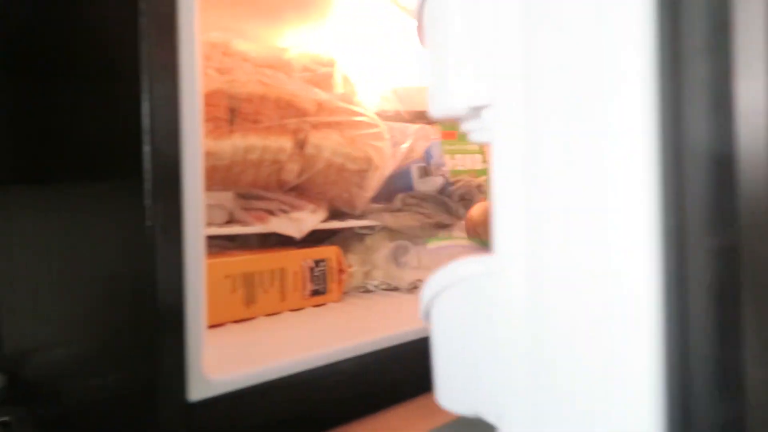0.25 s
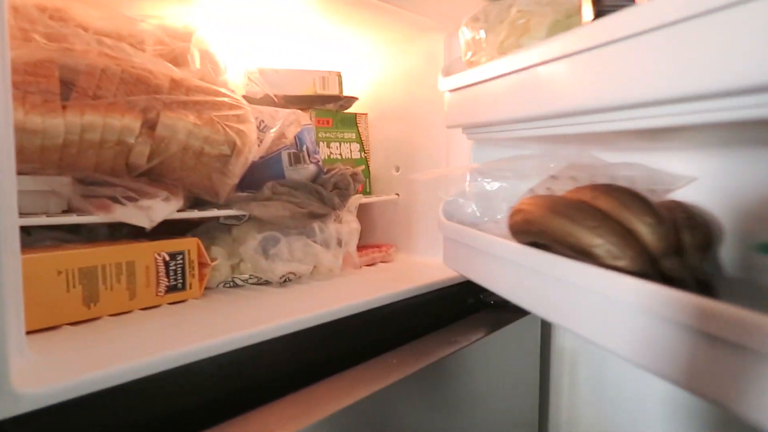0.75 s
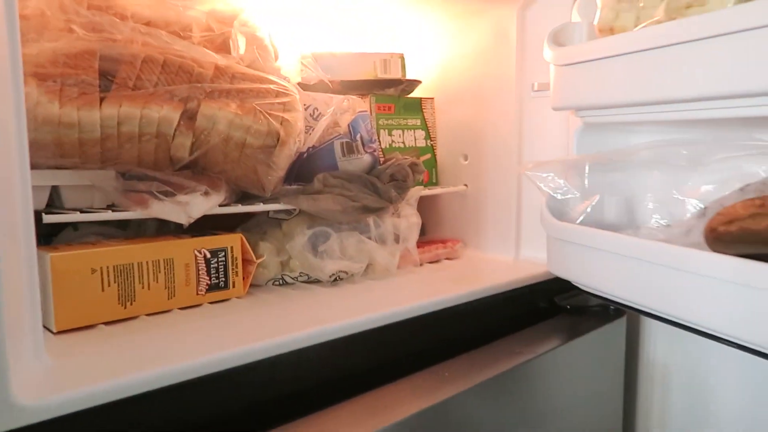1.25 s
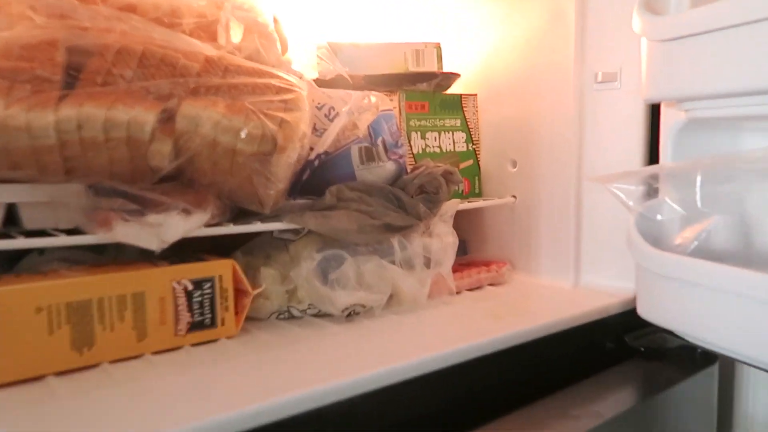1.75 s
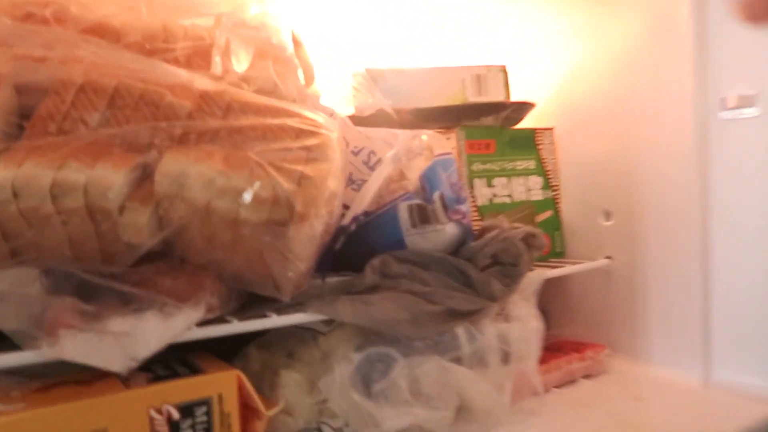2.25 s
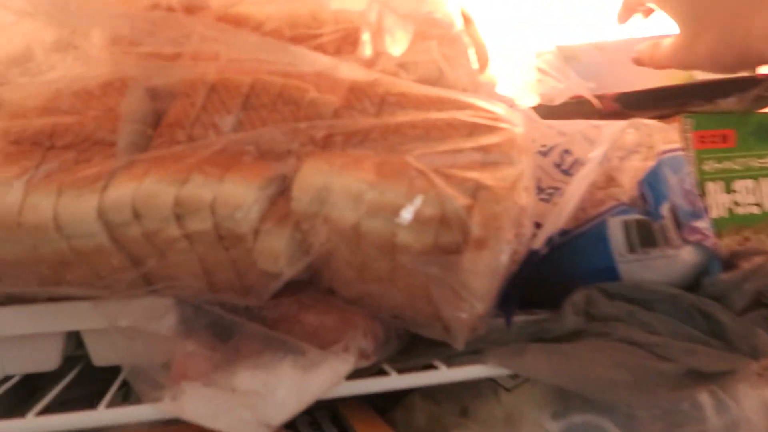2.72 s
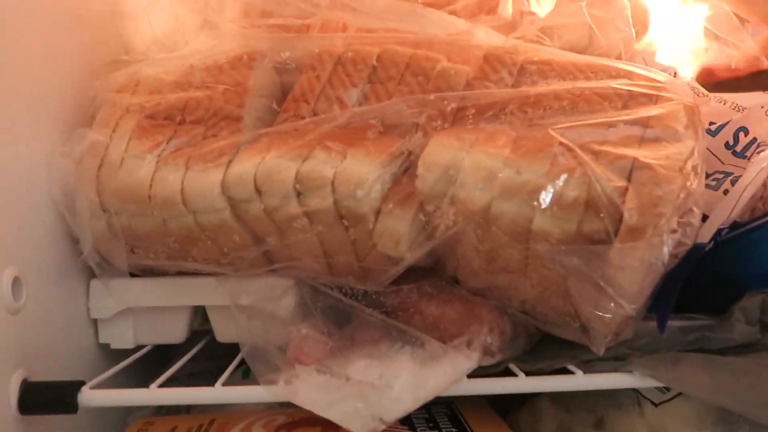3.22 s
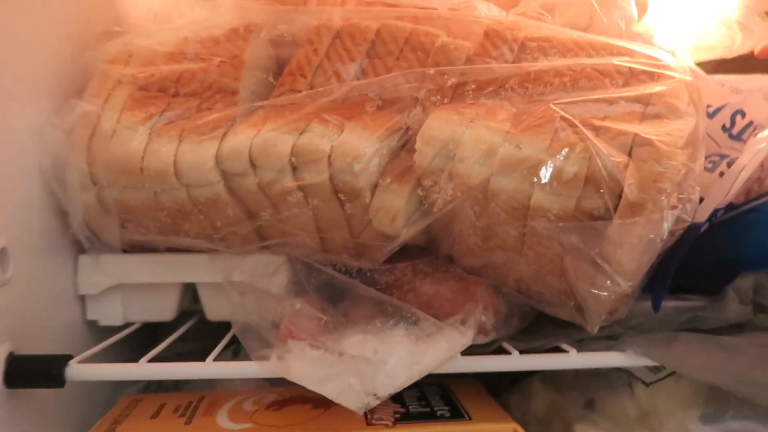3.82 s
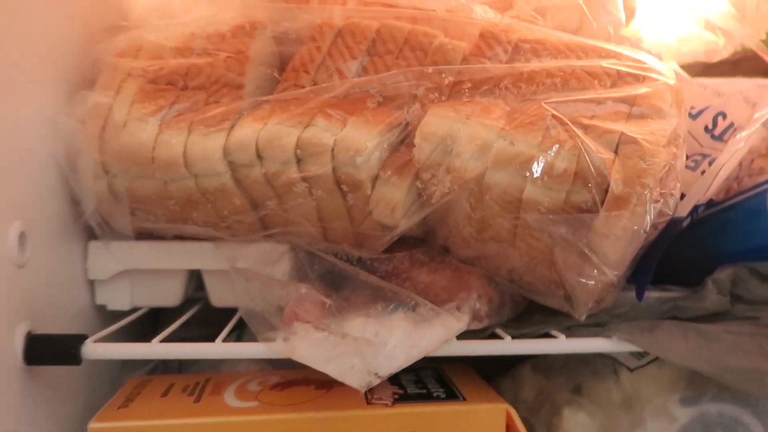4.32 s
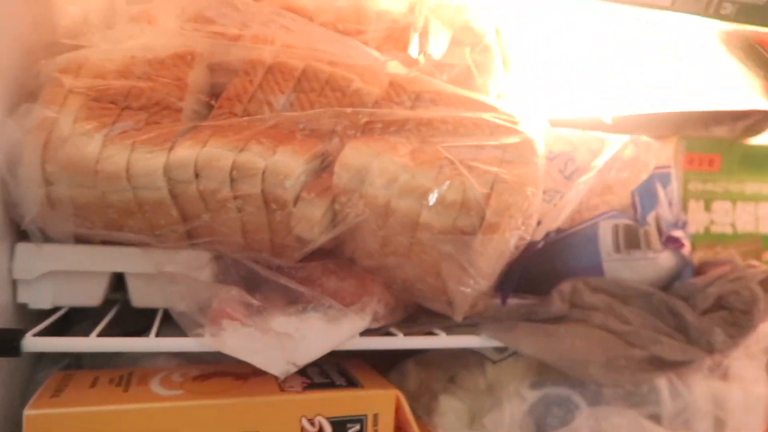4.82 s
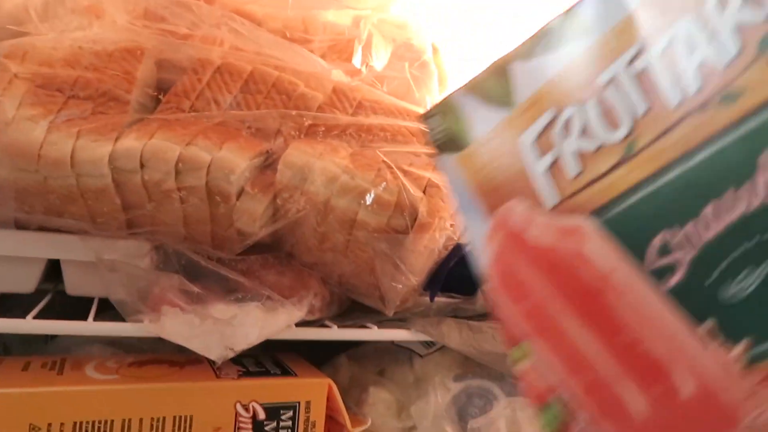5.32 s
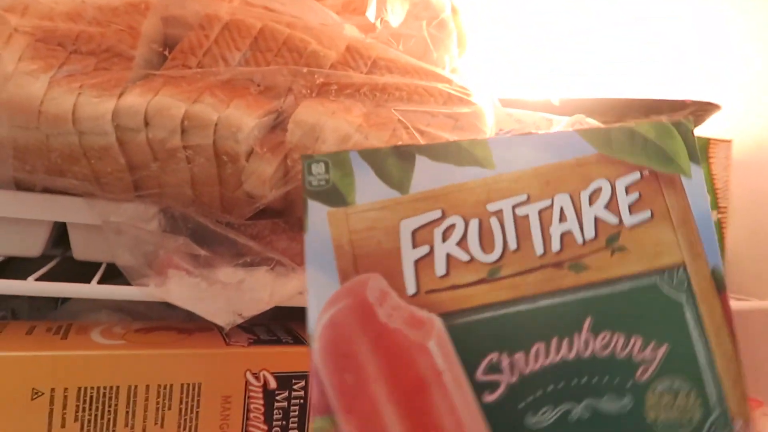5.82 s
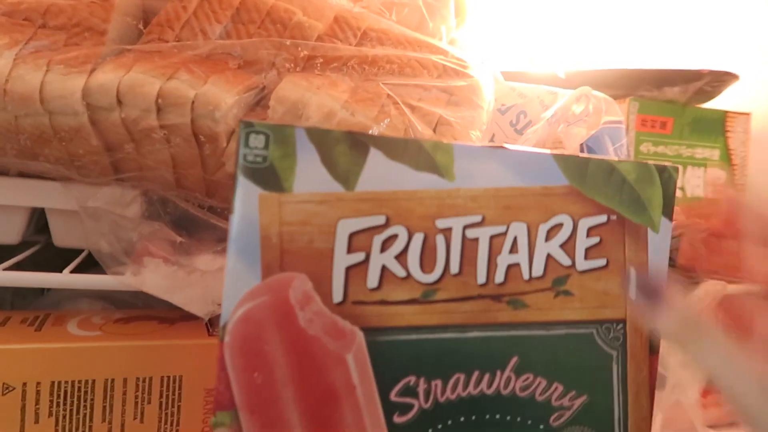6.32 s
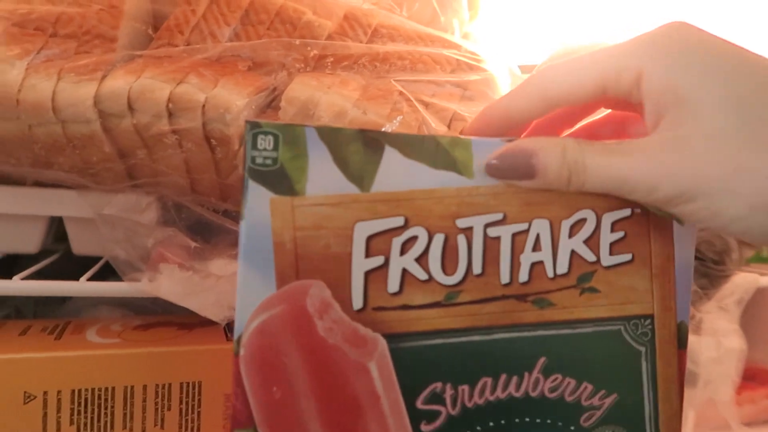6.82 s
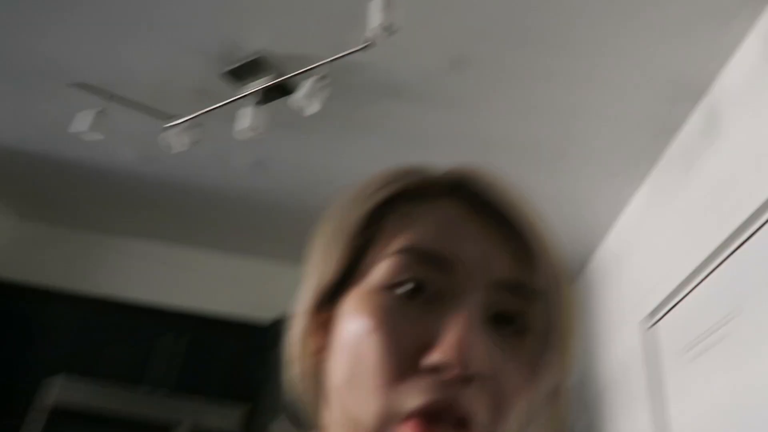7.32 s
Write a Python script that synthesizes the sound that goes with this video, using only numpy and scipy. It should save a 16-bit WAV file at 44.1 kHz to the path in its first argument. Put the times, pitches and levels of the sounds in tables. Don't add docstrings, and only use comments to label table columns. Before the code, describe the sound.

A freezer door opens onto a loud, low fan hum and airy rush, plastic bags crackle, a carton knocks, then abrupt near silence.

```python
import sys
import numpy as np
from scipy import signal
from scipy.fft import rfft, irfft
from scipy.io import wavfile
from scipy.ndimage import uniform_filter1d

SR = 44100
rng = np.random.default_rng(int(sys.argv[2]) if len(sys.argv) > 2 else 0)


def unload_audio(sound):
    columns = np.transpose(np.atleast_2d(sound))
    steps = np.round(np.clip(columns, -1, 1) * 32767)
    wavfile.write(sys.argv[1], SR, steps.astype(np.int16))


def gain_from_db(level_db):
    decades = np.asarray(level_db, float) / 20
    return 10 ** decades


N = 333372
CUT_IN_S, CUT_OUT_S = 0.167, 7.3705

# time_s, nearness_to_fan_db, grille_whistle_db
APPROACH = [(.16, -12.5, -10), (.36, -9.5, -10.5), (.76, -6.5, 5), (1.28, -6, 9), (2.05, -3.5, 10),
            (2.4, -2, 12), (2.85, 1, 3), (3.13, 0, 10), (3.5, 1.5, 9.5), (4.4, .5, 16), (4.86, -0.5, 5),
            (5.15, -1, 7), (5.56, 0.5, 7), (5.92, -1, 16.5), (6.2, 0, 11), (6.87, 1, 13), (7.2, .5, 7),
            (7.37, -1, 7)]
# time_s, stance (0 at the door, 1 deep inside, 2 behind the carton)
STANCE = [
    (0, 0),
    (1.2, .12),
    (2.1, .35),
    (2.5, 1),
    (4.5, 1),
    (5.1, 2),
    (7.4, 2),
]


def evened(x):
    return x / np.sqrt(np.mean(np.atleast_2d(x)[0] ** 2) + 1e-20)


def read(points, hz):
    point_hz, value = np.transpose(points)
    return np.interp(np.log(np.minimum(hz, 12500) + 1), np.log(point_hz + 1), value)


def peak(hz, centre_hz, width_hz):
    return 1 / (1 + (2 * (hz - centre_hz) / width_hz) ** 2)


def band(x, centre_hz, width_hz, order=2):
    edges_hz = np.clip([centre_hz - width_hz / 2, centre_hz + width_hz / 2], 30, SR / 2 - 500)
    return signal.sosfilt(signal.butter(order, edges_hz, "band", fs=SR, output="sos"), x)


def wander(rate_hz):
    t = np.arange(N) / SR
    rates_hz = rate_hz * np.geomspace(.05, 1, 12)
    return evened(sum(np.sin(2 * np.pi * (f * t + rng.random())) / np.sqrt(f) for f in rates_hz))


def control(t, order, table=APPROACH):
    rows = np.array(table)
    return np.interp(t, rows[:, 0], rows[:, order])


def air(colour_db, size, patchy_db, count=12):
    # hz, side_minus_mid_db
    width_db = [(40, -26), (65, -20), (110, -36), (200, -24.5), (380, -18), (700, -16.5), (1290, -18),
                (2380, -18), (4400, -10), (8120, -6.5), (15000, 7)]
    hz = np.fft.rfftfreq(size, 1 / SR)[:, None]
    t = np.arange(4 * N // size + 5) * size / 4 / SR
    a, b, c, d, patches = rng.standard_normal((len(t), len(hz), 5)).T
    patches = uniform_filter1d(patches, size=4, axis=0)
    patches = evened(uniform_filter1d(patches, size=count, axis=1).ravel()).reshape(a.shape)
    height = gain_from_db(colour_db(hz, t) + 0 * t)
    height = height / np.linalg.norm(height, axis=0) * gain_from_db(patchy_db * patches)
    z = np.array([a + 1j * b, gain_from_db(read(width_db, hz)) * (c + 1j * d)]) * height
    return evened(signal.istft(z, nperseg=size, noverlap=3 * size // 4)[1][:, :N])


def burst(noise, ms, rise):
    u = np.arange(noise.shape[-1]) / SR / (abs(ms) / 1000)
    return noise * (1 - np.exp(-u / rise)) * np.exp(-u ** 2 * 1.86)


def add(out, s, mid, side, db):
    part = out[:, round((s - .001) * SR):][:, :len(mid)]
    part += np.array([mid, side]) * gain_from_db(db) / np.abs(mid).max()


def kitchen():
    # hz, level_db_per_hz
    before_colour = [(25, -34), (45, -14), (85, -12), (118, 0), (145, -13), (175, -3.5), (260, -16),
                     (400, -19.5), (600, -20), (1000, -33.5), (2000, -45), (4000, -51), (8000, -64),
                     (12500, -73)]
    # hz, level_db_per_hz
    after_colour = [(25, -35), (45, -15), (100, -17), (150, 1.5), (250, -7.5), (400, -8.5), (500, -12.5),
                    (700, -17), (1000, -22.5), (2000, -32.5), (4000, -44), (8000, -52.5), (12500, -59)]
    before = gain_from_db(-31.5) * air(lambda hz, t: read(before_colour, hz), size=2048, patchy_db=3.0)
    after = gain_from_db(-37.5) * air(lambda hz, t: read(after_colour, hz), size=2048, patchy_db=1.5)
    hum_hz, hum_db = 147, -45
    hum = gain_from_db(hum_db) * np.sqrt(2) * np.sin(2 * np.pi * hum_hz * np.arange(N) / SR)
    return before, after + hum * np.array([[1], [0]])


def puff():
    start_s, end_s, level_db = 3.71, 3.92, -33
    u = np.clip((np.arange(N) / SR - start_s) / (end_s - start_s), 0, 1)
    flutter = evened(band(rng.standard_normal(N), 80, 100))
    return gain_from_db(level_db) * np.sin(np.pi * u) * flutter * np.array([[0], [1]])


def slides():
    # peak_s, rise_s, fall_s, level_db
    strokes = [(.18, 0.11, 0.043, -66), (1.53, .1, 0.082, -60), (2., .3, 0.25, -55.5),
               (2.47, .15, 0.17, -50), (3.1, 0.14, 0.34, -53), (3.35, 0.038, 0.044, -50),
               (3.42, .04, .05, -54), (3.52, 0.036, 0.034, -45), (3.76, 0.13, 0.079, -47.5),
               (4.11, 0.43, .12, -51), (4.43, 0.14, 0.15, -46), (4.63, 0.043, 0.084, -42),
               (4.82, 0.1, 0.06, -46), (4.89, .09, .07, -43.5), (4.96, 0.054, 0.033, -40),
               (5.3, .15, .12, -65), (5.7, 0.024, .05, -51), (5.95, 0.13, .1, -53),
               (6.12, 0.12, 0.072, -46), (6.3, .1, 0.23, -62), (6.6, 0.058, .06, -53.5),
               (7., 0.035, .08, -48), (7.1, 0.091, 0.079, -47), (7.28, 0.092, .15, -58),
               (7.4, .03, .03, -67), (7.548, .012, .03, -54)]
    # hz, level_db_per_hz
    hiss_colour = [(880, -42), (1500, -2), (1610, -2.5), (1760, -6), (2220, 0), (3390, -15.5), (4510, -9.5),
                   (4880, -10.5), (6600, -15), (12500, -23.5), (16200, -53.5), (22000, -120)]
    fall_db, grit_db = -9, 2.2
    t = np.arange(N) / SR
    power = 0
    for peak_s, rise_s, fall_s, db in strokes:
        away = abs(t - peak_s) / np.where(t < peak_s, rise_s, fall_s)
        same_side_of_cut = (t < CUT_OUT_S) == (peak_s < CUT_OUT_S)
        power = power + gain_from_db(2 * (db + fall_db * away)) * same_side_of_cut
    grit = uniform_filter1d(rng.standard_normal(N), size=120) * np.sqrt(120)
    hiss = air(lambda hz, t: read(hiss_colour, hz), size=256, patchy_db=3.0, count=30)
    return np.sqrt(power) * gain_from_db(2.0 + grit_db * grit) * hiss * gain_from_db([[0], [3.]])


def snaps():
    # start_s, level_db, pan_db
    film_snaps = [(1.9937, -39, -1), (3.3169, -45, -8), (3.3353, -26.5, -9), (3.345, -31, -.6),
                  (3.3995, -36, 3), (3.4054, -30, 0), (3.418, -31, -7), (3.4876, -34, 0), (3.497, -32, 7),
                  (3.529, -24.5, -2), (3.5618, -37, 3), (3.631, -41, 5), (3.6501, -38, 2),
                  (3.7209, -39, -1.1), (3.7353, -38, -1.1), (3.7456, -30, -1), (3.7544, -29, 1.1),
                  (3.765, -25.5, 0), (3.7852, -28, .6), (3.8204, -41, -1.1), (4.13, -33, 2.1),
                  (4.183, -37, -4), (4.343, -25, 2.1), (4.3814, -38, -2), (4.742, -35, 1.1),
                  (4.956, -31, -1), (6.1055, -48, -4.5), (6.1452, -33, 4)]
    ticks_s = (.7751, .8939, 1.034, 2.1144, 2.716, 3.065, 3.4694, 5.2602, 5.472, 5.961, 6.587)
    # hz, half_lag_rad
    port_lag = [(3000, 0.15), (8000, 0.57), (10600, 1.17), (12500, 0.74)]
    fold_hz, fold_ms = (4030, 5930), (3.5, 7.5)
    out = np.zeros((2, N))
    rows = list(film_snaps) + [(s, -46, 0) for s in ticks_s]
    chances, noises = rng.random((len(rows), 2)), rng.standard_normal((len(rows), 2, 2048))
    for (s, db, pan_db), (fold, span), noise in zip(rows, chances, noises):
        ring_hz = np.interp(fold ** 2, (0, 1), fold_hz)
        cracks = burst(noise, np.interp(span, (0, 1), fold_ms), rise=0.83)
        mid, side = 1.1 * band(cracks, 5500, 13000) + 0.98 * band(cracks, ring_hz, 0.25 * ring_hz)
        lag_rad, z = read(port_lag, np.fft.rfftfreq(2048, 1 / SR)), rfft(mid)
        mid = irfft(z * np.cos(lag_rad))
        across = irfft(z * np.sin(lag_rad) * -1j)
        side = np.tanh(pan_db / 17.4) * mid + across + .3 * band(side, 11000, 10000, order=1)
        add(out, s, mid, side, db - 0.5)
    return out


def rings():
    # start_s, level_db, ring_hz, length_ms
    blow_rings = [(4.4628, -16, 1080, 7), (4.4628, -20, 1680, 3.5), (4.463, -24, 780, 5.8),
                  (4.4637, -9, 2470, 4), (4.4625, -18, 2150, 2.5), (4.467, -21, 2000, 3.3),
                  (4.470, -29, 2950, 4), (4.4635, -22, 3040, 4.7), (4.4625, -20, 3680, 3.3),
                  (4.463, -28, 5220, 4), (4.4641, -24, 5900, 2.6), (4.6083, -20.5, 1050, 7),
                  (4.6095, -20, 1530, 5), (4.6083, -13.5, 1900, 4.4), (4.611, -10.5, 2410, 2.9),
                  (4.6135, -20, 2300, 2.1), (4.6085, -20, 3630, 4), (4.610, -19.5, 4160, 5),
                  (4.608, -22, 5280, 3), (4.610, -26, 6390, 4.9), (4.609, -26, 7400, 3.3),
                  (4.609, -27, 7900, 4.9), (4.7706, -22.5, 1060, 7.9), (4.7705, -27, 2200, 4),
                  (4.7765, -27, 2300, 4), (4.787, -27, 1150, 9), (4.774, -28, 1600, 3.6),
                  (4.7785, -31, 2620, 3.7), (4.779, -29, 1750, 4.4), (4.788, -33, 2250, 6),
                  (5.689, -28, 2150, 4), (5.692, -31, 1060, 9), (6.123, -23, 1890, 4),
                  (6.124, -27, 1350, 5), (6.13, -24, 400, 12), (6.1235, -30, 3400, 3.4),
                  (6.126, -30, 4350, 3.5), (6.126, -30, 3340, 7), (6.132, -27, 1940, 5.4),
                  (6.122, -28, 980, 12)]
    # start_s, level_db, ring_hz, length_ms
    more_blow_rings = [(4.121, -33, 1500, 4), (4.1225, -32, 2900, 4), (4.1315, -36, 4800, 4),
                       (4.132, -35, 2500, 4), (4.1415, -28, 2020, 4), (4.145, -28, 2680, 4),
                       (4.142, -33, 3750, 4), (4.145, -30, 880, 5), (4.741, -37, 5900, 5), (4.741, -34, 2300, 5),
                       (4.7632, -35, 2250, 4), (5.681, -35, 3100, 5), (4.181, -37, 2150, 6),
                       (4.7702, -30, 3800, 2.5), (4.7702, -32, 4600, 2.5), (4.7702, -31, 3000, 2.5),
                       (4.7702, -35, 5600, 2), (4.7702, -35, 6500, 2), (4.7702, -35, 7600, 2.5),
                       (4.7745, -38, 4300, 5), (4.7745, -41, 5800, 3), (4.779, -38, 3600, 4),
                       (4.7705, -28, 1500, 3), (4.778, -27, 900, 5), (4.792, -33, 1800, 6), (4.801, -33, 2100, 5),
                       (4.809, -31, 1050, 8), (6.106, -35, 2900, 5), (6.107, -38, 4500, 5),
                       (6.132, -29, 1000, 12), (6.147, -35, 2850, 8), (6.15, -31, 750, 12), (6.168, -32, 1150, 8)]
    out, t = np.zeros((2, N)), np.arange(2048) / SR
    for s, db, hz, ms in list(blow_rings) + list(more_blow_rings):
        ring = burst(np.sin(2 * np.pi * hz * t), ms, rise=0.24)
        add(out, s, ring, .25 * np.sqrt(1000 / hz) * np.roll(ring, shift=10), db)
    return out


def knocks():
    # start_s, level_db, ring_hz, treble_rel_db, length_ms
    hits = [(4.12, -30, 2200, -12, 5.8), (4.141, -28, 2260, -18, 7.5), (4.4625, -14, 2300, 2, 2.4),
            (4.4634, -20, 1800, -2, 4.6), (4.608, -11, 2280, -8, 6.2), (4.7708, -25, 1560, -4, 2.7),
            (4.7745, -25, 1300, -12, 9), (5.6898, -28, 1800, -20, 2.8), (5.69, -18.5, 2200, -20, 18),
            (5.703, -21, 2500, -16, 20), (6.123, -25, 1870, -10, 8), (6.1328, -26, 1900, -18, 7.2),
            (4.773, -24, 2300, -16, 8), (4.786, -29, 1700, -18, 12), (4.799, -32, 1900, -18, 14),
            (4.467, -26, 1500, -14, 9), (6.126, -29, 2700, -8, 12), (4.619, -30, 2100, -12, 16),
            (4.637, -33, 2300, -12, 20), (4.776, -27, 1700, -14, 6), (5.709, -29, 1100, -14, 10)]
    body_db, body_db_per_doubling = -8, 7.5
    out = np.zeros((2, N))
    for (s, db, hz, high_db, ms), noise in zip(hits, rng.standard_normal((len(hits), 2, 4096))):
        low_db = body_db + body_db_per_doubling * np.log2(ms / 4)
        grains = noise * np.sqrt(np.abs(noise))
        cracks = burst(grains, ms, rise=0.57)
        panel = band(cracks, hz, 850) + 0.19 * band(cracks, 1.65 * hz, 600) + 0.5 * band(cracks, 2200, 2700)
        slow = burst(grains, 1.3 * ms, rise=0.028)
        body = evened(band(slow, 1030, 820) + (ms / 4.8) ** 2 * band(slow, 570, 990))
        edge = .5 * band(burst(noise, 0.5 * ms, rise=0.32), 6900, 10300) + band(cracks, 5200, 1470)
        hit = evened(panel) * gain_from_db([[0], [-23]])
        hit = hit + body * gain_from_db([[low_db], [low_db - 14]])
        hit = hit + evened(edge) * gain_from_db([[high_db], [high_db - 8]])
        add(out, s, *hit, db)
    t = np.arange(4096) / SR
    walls = band(rng.standard_normal((2, 4096)), 1560, 2700, order=1) * gain_from_db(-60 * t / 0.028) * (t > .003)
    walls = walls / np.linalg.norm(walls[0])
    rung = rings()
    answer = signal.oaconvolve(out + .3 * rung, walls, axes=1)[:, :N]
    return out + rung + gain_from_db(-13.5) * answer


def thuds():
    # start_s, level_db, ring_hz, t60_s
    thumps = [(3.9, -9.5, 182, 0.065), (4.773, -15, 350, 0.014), (4.7712, -21, 705, 0.037),
              (4.775, -22, 420, .04), (4.609, -24, 730, 0.039), (5.69, -7.5, 182, 0.06),
              (6.2, -20, 320, .05), (4.776, -13, 180, 0.037), (6.6, -18, 190, 0.063),
              (5.69, -19, 465, 0.032)]
    out, t = np.zeros((2, N)), np.arange(4096) / SR
    for s, db, hz, t60_s in thumps:
        ring = (1 - np.exp(-t * hz * 2.7)) * gain_from_db(-60 * t / t60_s) * np.sin(2 * np.pi * hz * t)
        add(out, s, ring, .04 * ring, db)
    return out


def motor():
    shaft_hz, blades, mains_hz = 48.45, 4, 118.
    # level_when_nearest_db, share_of_nearness, wavering_db
    tones = [
        (-25, 1.08, 1.3),
        (-39, 0.28, 2.5),
        (-49, 0.27, 2.),
    ]
    # time_s, width_s, level_db
    sways = [(.6, .17, 6), (1.33, .17, 7), (3.55, .12, 6), (3.9, .15, 7), (5.1, .12, 4), (7.3, .08, 5)]
    t = np.arange(N) / SR
    turns = np.cumsum(shaft_hz * (1 + 0.0015 * wander(3.048))) / SR
    phases = 2 * np.pi * np.array([blades * turns, mains_hz * t, turns])
    levels = gain_from_db([db + share * control(t, order=1) + waver_db * wander(6.) for db, share, waver_db in tones])
    sway_db = sum(db * np.exp(-((t - s) / width_s) ** 2) for s, width_s, db in sways)
    levels = levels * gain_from_db(np.outer([0, 0, 1], sway_db))
    return np.sqrt(2) * (levels * np.sin(phases)).sum(axis=0) * np.array([[1], [.03]])


def boom_db(hz, t):
    # hz, width_hz, door_db, inside_db
    modes = [(52, 14, -23, -28), (96, 50, -23, -17), (116.5, 9.2, -12, -11.5), (160, 26, -5.5, 1.5),
             (190.5, 23, -5.5, -7.5), (215.3, 30.4, -11, -9), (259.2, 31.7, -11.5, -10.5),
             (295.6, 46, -14, -16), (359, 35, -18.5, -14), (398, 18, -22, -12.5), (408, 9, -13, -20),
             (435, 22.6, -28.5, -16), (478.5, 24.3, -23, -20.5), (516, 13.7, -24.5, -26.5)]
    inside = np.minimum(control(t, order=1, table=STANCE), 1)
    power = sum(gain_from_db(2 * (door + (deep - door) * inside)) * peak(hz, f, w) ** 1.81 for f, w, door, deep in modes)
    return 10 * np.log10(power)


def rush_db(hz, t):
    # hz, level_db_per_hz
    door_colour = [(310, -39), (520, 2.5), (610, -9.5), (725, -5), (1220, -10.5), (1550, -15.5),
                   (2970, -20), (4260, -25.5), (12500, -46.5), (16200, -86.5), (22000, -120)]
    # hz, level_db_per_hz
    inside_colour = [(310, -27), (520, -1), (755, -3.5), (1070, -2), (1860, -17), (2100, -14.5),
                     (2970, -19), (3490, -18), (5060, -28.5), (12500, -47), (16200, -72), (22000, -120)]
    # hz, width_hz, door_db, inside_db, behind_carton_db
    shelf_waves = [(702, 65, 4.5, 5.5, -1), (875, 100, -0.5, 6, 2.5), (1028, 87, -0.5, 6, 5),
                   (1625, 260, 5, 2, -0.5), (1900, 200, 4.5, 4.5, 0), (2200, 290, -0.5, 5.5, 4.5),
                   (2500, 87, -0.5, 8, 1.5), (2700, 150, 0, -3, 0), (3330, 200, 3, 1, 0),
                   (3680, 300, -1, -4.5, -0.5), (4020, 290, -3, 8.5, -2), (4720, 250, 2, 4.5, -6),
                   (5040, 320, -2.5, 1, 6.5), (5600, 220, -1, 6.5, 3), (6400, 250, -3.5, 3, -2),
                   (7570, 500, -1, 7.5, 5), (8160, 250, 1, 4, 4.5), (11200, 900, 7.5, 8, 5.5)]
    bright = (.05, 0.52, 0.52)
    grille_hz, grille_width_hz = (2900, 3030, 2990), 170
    stance = control(t, order=1, table=STANCE)
    inside = np.clip(np.interp(stance, range(3), bright), 0, 1)
    waves = sum(peak(hz, f, w) * np.interp(stance, range(3), dbs) for f, w, *dbs in shelf_waves)
    whistle = peak(hz, np.interp(stance, range(3), grille_hz), grille_width_hz) * control(t, order=2)
    return (1 - inside) * read(door_colour, hz) + inside * read(inside_colour, hz) + waves + whistle


def fan():
    lull_s, lull_width_s, lull_db = 2.06, .03, -9
    t = np.arange(N) / SR
    near_db = control(t, order=1)
    node_db = lull_db * np.exp(-((t - lull_s) / lull_width_s) ** 2)
    boom = gain_from_db(-19.5 + near_db + node_db) * air(boom_db, size=4096, patchy_db=0.72)
    return boom + gain_from_db(-36 + 0.69 * near_db) * air(rush_db, size=512, patchy_db=1.81, count=120)


def scene():
    t = np.arange(N) / SR
    before, after = kitchen()
    opened = np.pi / 2 * np.clip((t - CUT_IN_S) / 0.12 + .5, 0, 1)
    freezer = np.cos(opened) * before + np.sin(opened) * fan() + motor()
    handling = slides()
    freezer = freezer + snaps() + knocks() + thuds() + puff()
    mid, side = np.where(t < CUT_OUT_S, freezer, after) + handling
    return np.array([mid + side, mid - side]) * gain_from_db([[-.1], [.1]])


def narrowed(side):
    # hz, share_of_blocks_lost
    lost_share = [(40, .5), (120, .35), (200, 0), (800, 0.01), (1100, .25), (1500, 0.4), (2400, 0.78),
                  (3300, 0.4), (4500, 0.62), (6200, 0.4), (7200, .03), (9000, 0)]
    hz, t, z = signal.stft(side, SR, nperseg=512)
    blocks = rng.standard_normal((len(t) // 4 + 1, len(hz) // 6 + 1))
    blocks = uniform_filter1d(blocks, size=4, axis=0) * 2
    spread = np.kron(blocks, np.ones((4, 6)))[:len(t), :len(hz)].T
    chance = .5 + .5 * np.tanh(.85 * spread)
    strength = np.abs(z[20:90]).sum(axis=0)
    steady = strength < 2.5 * np.median(strength)
    lost = (chance < read(lost_share, hz)[:, None]) & (t > .5) & (t < CUT_OUT_S) & steady
    return signal.istft(z * ~lost, SR, nperseg=512)[1][:N]


def masked(x):
    # hz, bar_over_running_level_db, gain_db
    top_band = [(11800, -12, 0), (12500, -8, 0), (12900, -4, -1), (13050, 4, -5), (13300, 0, -4),
                (13900, -1.5, -4), (14450, .5, -6), (14700, 5.5, -9), (15300, 10, -12), (15800, 15, -15)]
    top_from_hz, hum_share, treble_share, chance_db = 11800, .4, .35, 3.
    hz, t, z = signal.stft(x, SR, nperseg=512)
    bar_hz, bar_db, gain_db = np.transpose(top_band)
    power = uniform_filter1d((abs(z) ** 2).mean(axis=0), size=12, axis=0)
    level_db = 10 * np.log10(uniform_filter1d(power, size=3, axis=1) + 1e-20)
    hum_power = (abs(z[:, :8]) ** 2).sum(axis=(0, 1))
    hum_db = 10 * np.log10(uniform_filter1d(hum_power, size=60) + 1e-20)
    chance = uniform_filter1d(rng.standard_normal((len(t), len(hz))), size=7, axis=0)
    chance = uniform_filter1d(chance, size=5, axis=1).T
    spells = uniform_filter1d(rng.standard_normal(len(t)), size=16) * 4
    running_db = uniform_filter1d(level_db, size=34, axis=1)
    treble_db = np.maximum(running_db - np.median(running_db, axis=1)[:, None], -2)
    over_db = level_db - running_db - hum_share * (hum_db - np.median(hum_db)) - treble_share * treble_db
    over_db = over_db + chance_db * (chance / chance.std() + spells) / np.sqrt(2)
    kept = (over_db > np.interp(hz, bar_hz, bar_db)[:, None]) | (hz < top_from_hz)[:, None]
    gain = gain_from_db(np.interp(hz, bar_hz, gain_db))[:, None]
    return signal.istft(z * kept * gain, SR, nperseg=512)[1][:, :N]


def top_cut(x):
    return signal.sosfilt(signal.butter(12, 15740, fs=SR, output="sos"), x)


def record(dry):
    mid, side = dry.mean(axis=0), narrowed((dry[0] - dry[1]) / 2)
    mix = masked(np.array([mid + side, mid - side]))
    return top_cut(mix)


dry = scene()
out = record(dry)
unload_audio(out)
```